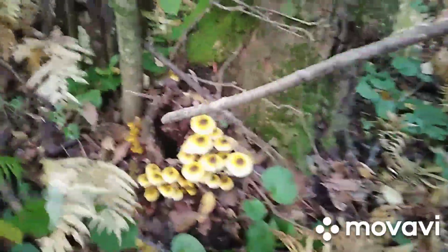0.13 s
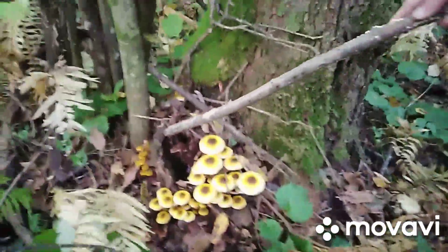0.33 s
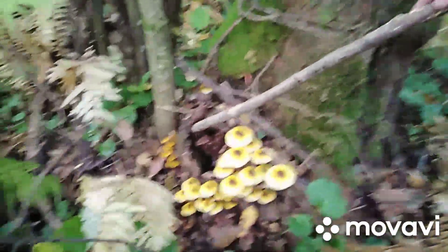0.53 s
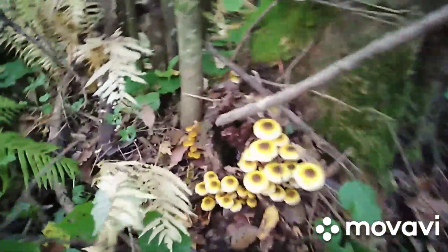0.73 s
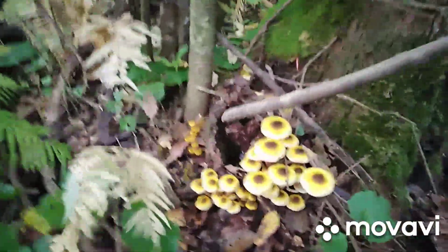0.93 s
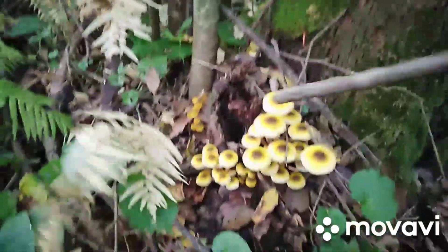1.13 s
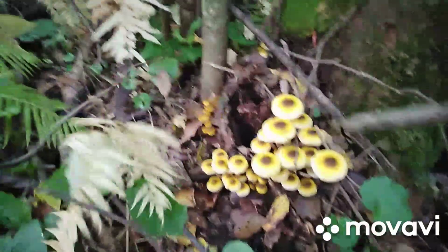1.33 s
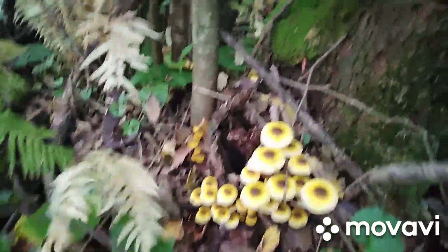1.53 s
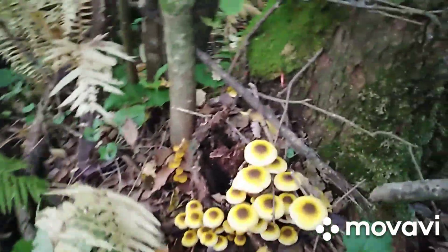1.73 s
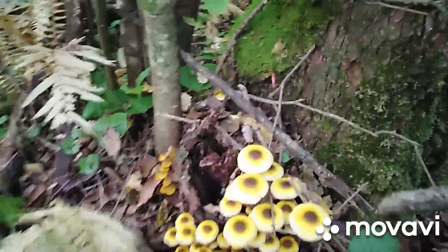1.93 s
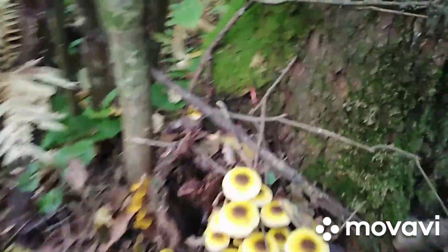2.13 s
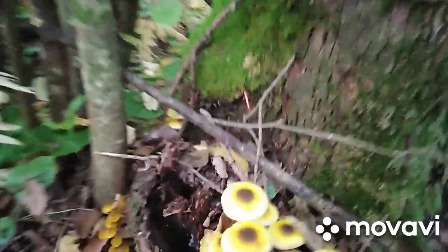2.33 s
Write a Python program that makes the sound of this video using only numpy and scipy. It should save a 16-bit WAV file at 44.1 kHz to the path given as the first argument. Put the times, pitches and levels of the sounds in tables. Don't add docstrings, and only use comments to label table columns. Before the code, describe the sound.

Dry leaves and twigs crackle and snap underfoot, with one very loud branch crack near one second

```python
import sys
import numpy as np
from scipy import signal
from scipy.io import wavfile
from scipy.ndimage import uniform_filter1d

SR = 44100
rng = np.random.default_rng(int(sys.argv[2]) if len(sys.argv) > 2 else 0)


def unload_audio(sound):
    columns = np.transpose(np.atleast_2d(sound))
    steps = np.round(np.clip(columns, -1, 1) * 32767)
    wavfile.write(sys.argv[1], SR, steps.astype(np.int16))


def volts(x):
    e = np.asarray(x, float) / 20
    return 10 ** e


N = 109853

# frequency in Hz, likeness from 0 to 1.
LIKENESS = [(100, 0.94), (640, 0.91), (1400, 0.088), (3000, 0.008)]
# frequency in Hz, level in dB per Hz.
AIR_COLOUR = [(150, -55), (260, -4), (2030, 0), (3530, -11), (6690, -10.5), (14500, -29)]
AIR_DB = -57
QUIET_TOP_HZ = 14950

# time in seconds, level in dB.
STIR = [(0, -37), (.15, -50), (.28, -59), (.42, -54), (.5, -44.5), (.68, -40.5), (.92, -47), (1.12, -45.5),
        (1.35, -42.5), (1.47, -47.5), (1.62, -40), (1.8, -38), (1.88, -35.5), (2.1, -35.5), (2.28, -26.5),
        (2.422, -37), (2.49, -32.5)]
# peak time in seconds, level in dB, rise in seconds, fall in seconds,
# body against crisp in dB.
CRUSHES = [(0.084, -30.5, 0.038, 0.045, -0.5), (0.473, -53.5, 0.0037, 0.12, 10.5),
           (.55, -33, 0.023, 0.018, -23), (0.618, -48.5, 0.006, 0.034, 11),
           (0.783, -24.5, 0.057, 0.043, 0.5), (.87, -31, 0.07, 0.014, -4), (1.046, -24, 0.068, 0.051, -4.5),
           (1.199, -32, 0.052, 0.044, -6.5), (1.254, -32, 0.029, 0.037, -1.5),
           (1.404, -36, 0.011, .012, -12), (1.553, -32, 0.064, 0.063, 1), (1.938, -30.5, 0.047, 0.085, 3.5),
           (2.06, -32, 0.024, 0.023, 2), (2.208, -22.5, 0.071, 0.079, -4), (2.352, -23, 0.028, 0.058, -5)]
# frequency in Hz, level in dB per Hz.
CRISP_COLOUR = [(1650, -13.5), (2800, -14), (4520, -12.5), (7500, -2), (9100, -11), (14200, -19),
                (14700, -21), (15000, -64), (15400, -82)]
# frequency in Hz, level in dB per Hz.
BODY_COLOUR = [(240, -8.5), (330, -7), (650, -4.5), (1050, -7), (1500, -3), (2500, -7), (3600, -15.5)]
# frequency in Hz, level in dB per Hz.
GROUND_COLOUR = [(40, -34), (80, -4), (150, 0), (300, 5)]
# time in seconds, left over right in dB.
LEAN = [(0, 5.5), (.3, 9.5), (.6, 2.5), (.85, 2), (1.1, 2.5), (1.5, 4.5), (1.85, 7.5), (1.95, 3),
        (2.1, 2.5), (2.49, 2.5)]
BODY_DB, BODY_LEAN_DB = -8.5, 1.5
GROUND_DB, GROUND_REST_DB = -50.5, -69
GROUND_GROWTH = 1.5
GRAINS_PER_S, GRAIN_SPREAD_DB, GRAIN_S = 500, 0.5, 0.0018
BLUR_DB = 2

# time in seconds, level in dB, pitch in Hz, glide in Hz per
# second, length in seconds.
SLIPS = [
    (.027, -34, 1680, 8000, .004),
    (.09, -36, 2300, 5000, .004),
    (.462, -43, 690, 4000, .005),
    (.471, -44, 1150, 45000, .004),
    (.48, -46, 850, 9000, .004),
         (0.074, -49, 1990, 9000, 0.042),
    (.075, -36, 4150, 5000, 0.0044),
    (.110, -39.5, 3690, 0, .005),
]
ROUGH_PER_S = 750

# time in seconds, peak in dB, pitch in Hz, decay in seconds, left over right in dB.
KNOCKS = [(.11, -56, 420, 0.0006, 38), (0.1152, -12.5, 284, 0.0017, 48), (.2, -53, 70.5, 0.011, 6),
          (.4, -52.5, 120, 0.0087, 16), (0.347, -47, 130, 0.005, 6), (0.362, -36, 556, 0.0012, 2.5),
          (0.5323, -33, 790, 0.0012, 8), (.735, -44, 160, 0.005, 1), (.76, -52, 76, 0.019, 4),
          (0.788, -26.5, 363, 0.002, 3.5), (0.959, -18.5, 130, 0.0053, -21),
          (0.9615, -10.5, 468, 0.00058, -13), (1.001, -31, 320, 0.0019, 6), (1.066, -39, 223, 0.0035, 0),
          (1.18, -57, 81, .012, 3), (1.189, -34.5, 510, 0.0009, -4), (1.365, -55, 120, 0.0048, 10),
          (1.444, -36, 297, 0.0037, 3.5), (1.56, -48.5, 102, 0.014, 4), (1.651, -33, 450, 0.0019, 2),
          (1.722, -33, 416, 0.0026, 3), (1.831, -34, 650, 0.0013, 1), (1.951, -33.5, 350, 0.0023, 2),
          (2.066, -29, 455, 0.00096, 14), (2.185, -28, 553, 0.0015, 1), (2.211, -33.5, 307, 0.0042, 0),
          (2.304, -19, 680, 0.00062, 1), (2.375, -33, 606, 0.002, 1.5), (2.458, -51, 101, 0.0072, 6)]
SAG = 0.22

# time in seconds, peak in dB, woody part in dB, left over right in dB,
# ring in Hz.
SNAPS = [(0.3132, -23.5, -19.5, 8, 9350), (0.344, -6, -17, 4, 6770), (0.3481, -21, -37, -3, 8000),
         (0.3905, -41, -12, 11, 5000), (0.4588, -34, -35, -1, 7200), (0.605, -35, -30, 4, 7050),
         (0.6838, -31, -25, -5, 6780), (0.7331, -16, -31, -5, 6800), (0.7468, -20, -40, -1, 7100),
         (0.8247, -18, -25, 9, 7260), (0.8455, -16, -26, 1, 7160), (0.9991, -9.5, -31, 6, 12500),
         (0.9999, -8, -32, 5, 7500), (1.0073, -14, -38, 1, 10500), (1.0885, -20, -23, 6, 6000),
         (1.2440, -14.5, -27, 4.5, 8050), (1.2524, -16.5, -34, 2, 6680), (1.2597, -17.5, -30, 7, 7000),
         (1.5262, -19, -30, 2, 6910),
         (1.5730, -11.5, -43, 0, 7600), (1.6398, -23, -38, 7, 8600), (1.6486, -10, -33, 2.5, 6500),
               (1.6498, -19.5, -42, 1, 7500), (1.7217, -13, -40, 4, 7300), (1.7447, -14, -19, 4, 7380),
               (1.928, -23, -32, -3, 7320), (1.9483, -18, -24, -4, 6560), (1.9504, -8.5, -31, 1, 7150),
               (1.952, -6.5, -33, -2, 7460), (2.1268, -11.5, -35, 4, 7440), (2.195, -13, -37, 1, 8950),
               (2.197, -7.5, -33, 4, 7100), (2.2091, -8, -29, 9.5, 6300), (2.284, -26, -32, 1, 6500),
               (2.3048, -6.5, -21, 2.5, 8500), (2.3274, -5.5, -26, 6, 8100),
               (2.3283, -6.5, -34.5, -1, 7460), (2.3466, -11.5, -37, 2, 7630), (2.3724, -7.5, -26, 4, 7100),
               (2.3774, -34, -19, 4, 9500), (2.4116, -28.5, -7, 6.5, 3970)]
# time in seconds, peak in dB, decay in seconds, woody part in dB.
BREAK = [(.9606, -5, .0008, -12), (.9619, 8, .0022, -4), (.9632, 5, .002, -12), (.9655, 3.5, .002, -22),
         (.9680, -1, .003, -24), (.9710, -5, .002, -24), (.9750, -3, .0008, -24), (.9788, 2, .0007, -24),
         (.9800, -11, .004, -24), (.9853, -8, .0015, -22), (.9893, -10, .005, -22)]
# frequency in Hz, level in dB per Hz.
TWIG_COLOUR = [(2500, -25), (3800, -13), (5400, 0), (6800, 8.5), (8500, 2.5), (11000, -4.5), (14000, -7.5),
               (16500, -50)]
# frequency in Hz, level in dB per Hz.
WOOD_COLOUR = [(800, -14.5), (1100, -9), (1500, -5.5), (2100, 0.5), (2900, -4), (3800, -4), (4600, -1.5)]
SNAP_RISE_S, SNAP_S, SCATTER_S = 0.00018, 0.0009, 0.003
SNAP_DB, SCATTER_DB, WOOD_DB = -8, -11.5, 14
RING_DB, RING_S = 0.5, 0.0004
TOCK_DB, TOCK_HZ, TOCK_S = 11.5, 3020, 0.00013
TOP_CARRIES_DB = -27

TIME = np.arange(N) / SR


def shape(s, rise, fall):
    t = TIME - s
    return np.exp(np.maximum(np.where(t < 0, t / rise, -t / fall), -50))


def panned(db):
    return volts(np.array([[db / 2], [-db / 2]]))


def colour(spectrum):
    hz, db = np.transpose(spectrum)
    edges = np.geomspace(hz[0], hz[-1], int(3 * np.log2(hz[-1] / hz[0])) + 2)
    mids = np.sqrt(edges[1:] * edges[:-1])
    gains = volts(np.interp(np.log(mids), np.log(hz), db))
    power = np.sum(gains ** 2 * np.diff(edges)) * 2 / SR
    return edges, mids, gains / np.sqrt(power)


def sound(envelope, spectrum, patchy_db):
    edges, mids, gains = colour(spectrum)
    like_hz, likeness = np.transpose(LIKENESS)
    white, out = rng.standard_normal((2, 2, N)), 0
    knots = np.arange(0, N + 700, 700)
    for k, hz in enumerate(mids):
        alike = np.clip(np.interp(np.log(hz), np.log(like_hz), likeness), 0, 1)
        mid, side = white[k % 2]
        pair = np.sqrt((1 + alike) / 2) * mid + np.sqrt((1 - alike) / 2) * side * [[1], [-1]]
        flicker = np.interp(np.arange(N), knots, rng.standard_normal(len(knots)))
        band = signal.butter(2, edges[k:k + 2], "band", fs=SR, output="sos")
        out = out + gains[k] * volts(patchy_db * flicker) * signal.sosfilt(band, pair * envelope + 1e-18)
    return out


def evened(spectrum, size):
    x = sound(np.ones(N), spectrum, patchy_db=1)
    return x / np.sqrt(uniform_filter1d(x ** 2, size) + 0.014)


def cut_top(x):
    return signal.sosfilt(signal.cheby2(16, 70, QUIET_TOP_HZ, fs=SR, output="sos"), x)


def air():
    return volts(AIR_DB) * sound(np.ones(N), AIR_COLOUR, patchy_db=-0.5)


def grains(busy):
    sizes = volts(GRAIN_SPREAD_DB * np.minimum(rng.exponential(1, N), 4)) * volts(rng.normal(0, 1, (2, N)))
    born = rng.random(N) < GRAINS_PER_S * busy / SR
    burst = signal.lfilter([1], [1, -np.exp(-1 / (GRAIN_S * SR))], sizes * born + 1e-18)
    burst = burst / np.sqrt(uniform_filter1d(burst ** 2, size=9000) + 0.075)
    burst = burst + volts(BLUR_DB) / busy ** 2
    return burst / np.sqrt(np.mean(burst ** 2))


def leaves():
    stir = volts(2 * np.interp(TIME, *np.transpose(STIR)))
    crisp, body, load = stir, stir, volts(GROUND_REST_DB)
    for s, db, rise, fall, body_db in CRUSHES:
        swell = shape(s, rise, fall) ** 2
        crisp = crisp + volts(2 * db) * swell
        body = body + volts(2 * (db + body_db)) * swell
        push_db = GROUND_DB + GROUND_GROWTH * (db + body_db + 30)
        load = load + volts(push_db) * shape(s + 0.016, rise, 0.79 * fall)
    fine = grains((crisp / np.median(crisp)) ** 0.12)
    rustle = sound(np.sqrt(crisp) * fine, CRISP_COLOUR, patchy_db=1.0)
    rumble = sound(load, GROUND_COLOUR, patchy_db=0.0)
    dull = volts(BODY_DB) * sound(np.sqrt(body) * fine ** 0.89, BODY_COLOUR, patchy_db=3.0)
    lean = volts(np.interp(TIME, *np.transpose(LEAN)) / 2 * [[1], [-1]])
    return lean * (rustle + panned(BODY_LEAN_DB) * (rumble + dull))


def scrape():
    out, rough = 0, uniform_filter1d(rng.standard_normal((2, N)), size=60)
    for s, db, hz, glide, length in SLIPS:
        u = TIME - s
        squeak = np.exp(-(u / length) ** 2) * np.sin(2 * np.pi * (hz * u + glide * u * u / 2))
        out = out + volts(db) * squeak * (1 + ROUGH_PER_S * length * rough)
    return out * panned(3)


def knocks():
    out = 0
    for s, db, hz, fall, pan in KNOCKS:
        u = np.maximum(TIME - s, 0) / fall
        side = panned(pan) / panned(abs(pan)).max()
        push = np.e * u * np.exp(-u)
        out = out - volts(db) * side * push * np.sin(2 * np.pi * hz * fall * np.log1p(SAG * u) / SAG)
    return out


def twigs():
    crisp, wood, ring = np.zeros((3, 2, N))
    for s, db, wood_db, pan, hz in SNAPS:
        s = s + 0.000915
        t = TIME - s
        crack = shape(s, SNAP_RISE_S, SNAP_S)
        scatter = volts(SCATTER_DB) * shape(s, SNAP_RISE_S, SCATTER_S)
        hit = volts(db + SNAP_DB) * panned(pan) * (crack + scatter)
        crisp = crisp + hit
        wood = wood + volts(wood_db + WOOD_DB) * hit
        tone = shape(s, SNAP_RISE_S, RING_S) * np.sin(2 * np.pi * hz * t)
        tock = shape(s, TOCK_S / 2, TOCK_S) * np.sin(2 * np.pi * TOCK_HZ * t)
        ring = ring + volts(db + SNAP_DB + RING_DB) * panned(pan) * tone
        ring = ring + volts(db + wood_db + TOCK_DB) * panned(pan) * tock
    for s, db, fall, wood_db in BREAK:
        hit = volts(db - 11) * panned(8.8) * shape(s, SNAP_RISE_S, fall)
        crisp = crisp + hit
        wood = wood + volts(wood_db) * hit
    cracks = ring + crisp * evened(TWIG_COLOUR, size=30) + wood * evened(WOOD_COLOUR, size=90)
    carries = np.clip(uniform_filter1d(crisp, size=40) / volts(TOP_CARRIES_DB) - 1, 0, 1)
    return carries * cracks + cut_top((1 - carries) * cracks)


def scene():
    faint = cut_top(air() + leaves() + scrape())
    return faint + knocks() + twigs()


def low_pass(x):
    return signal.sosfilt(signal.butter(12, 15580, fs=SR, output="sos"), x)


def record(dry):
    mix = np.clip(dry, -1, 1)
    return low_pass(mix)


dry = scene()
out = record(dry)
unload_audio(out)
```